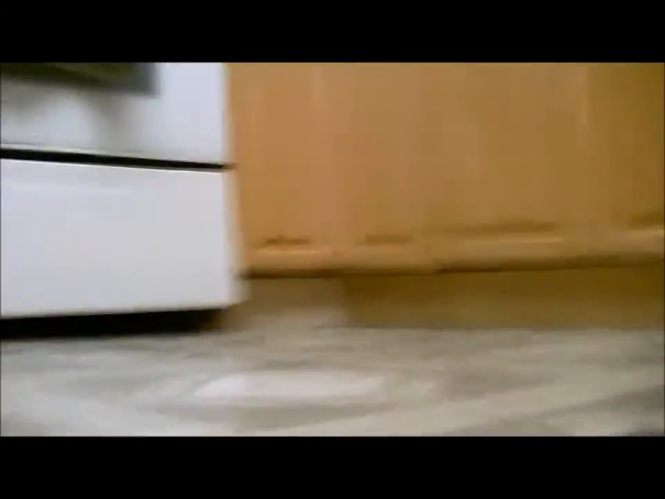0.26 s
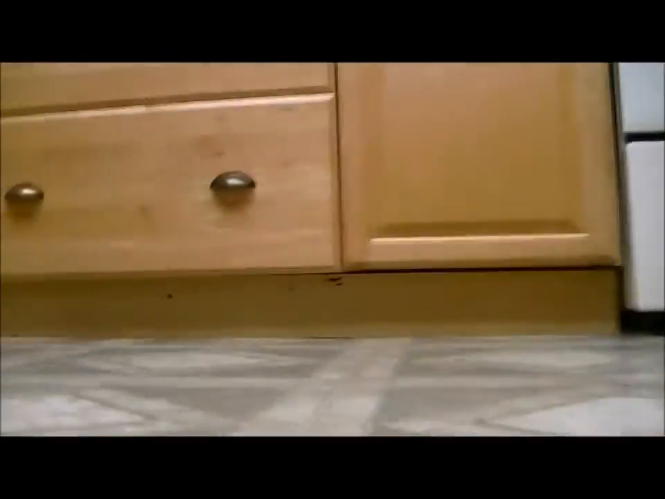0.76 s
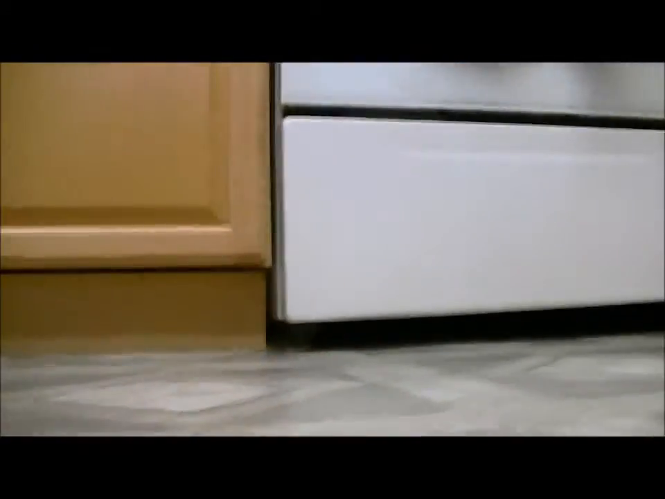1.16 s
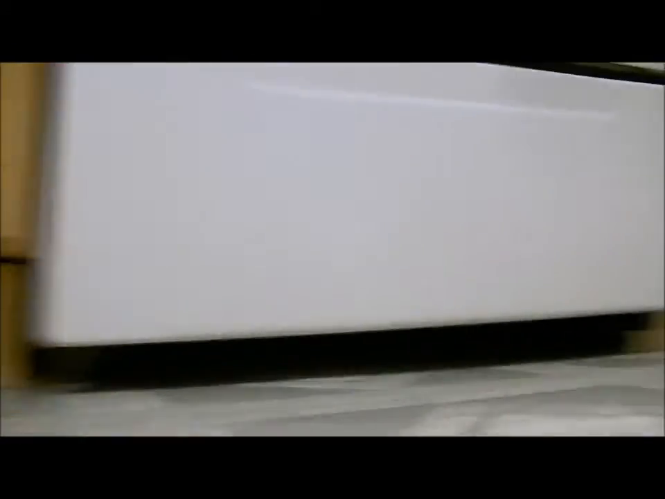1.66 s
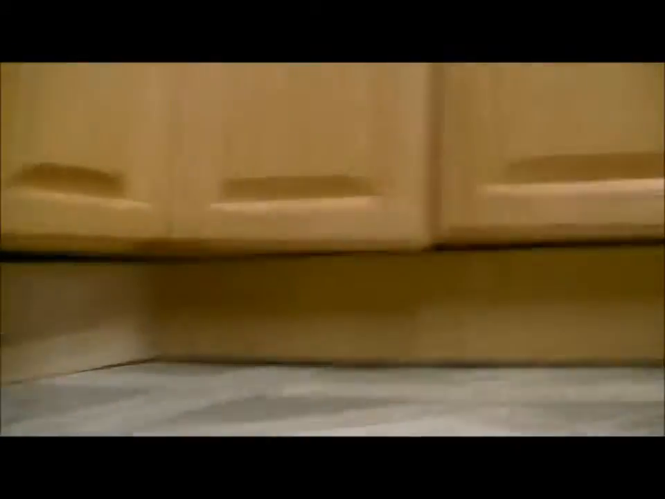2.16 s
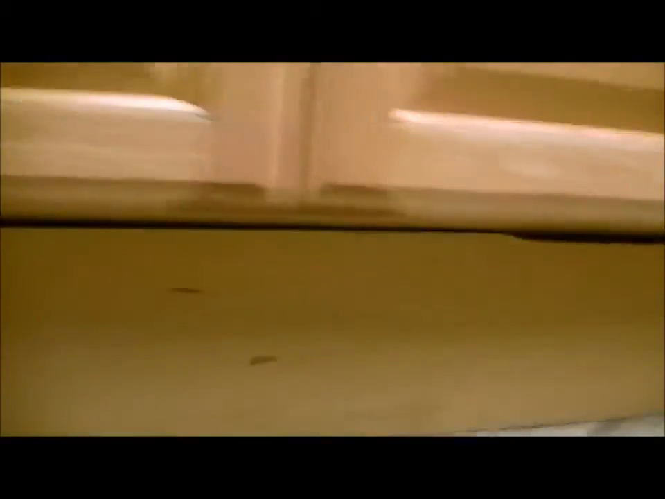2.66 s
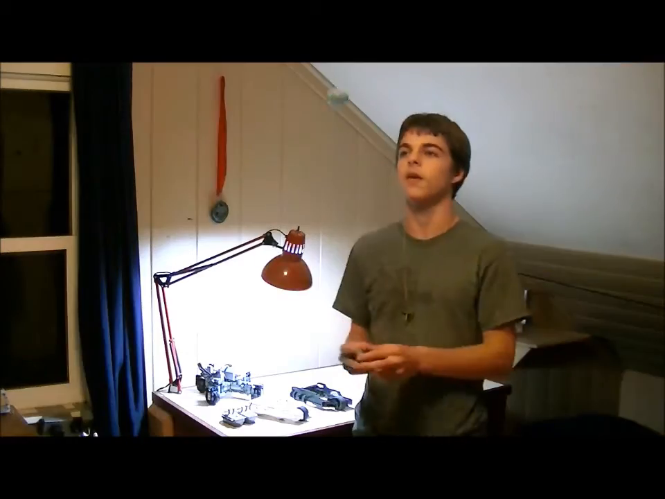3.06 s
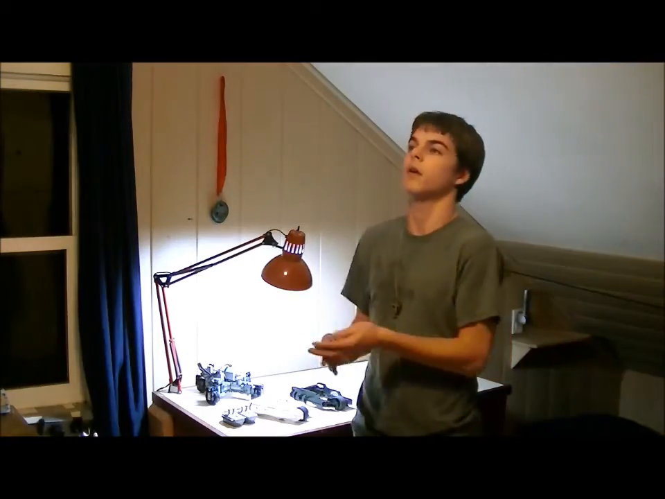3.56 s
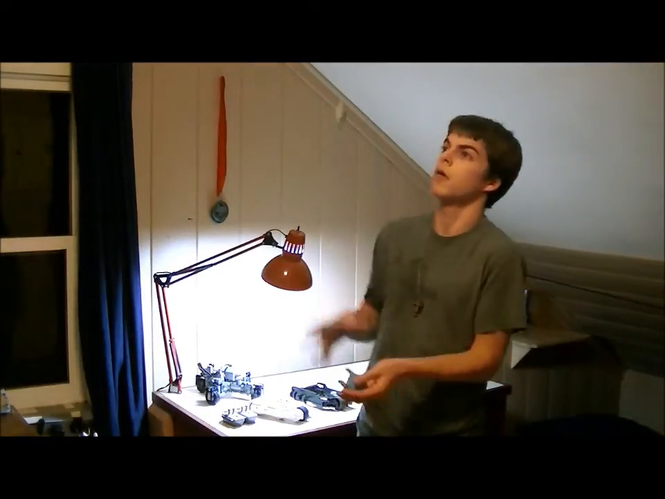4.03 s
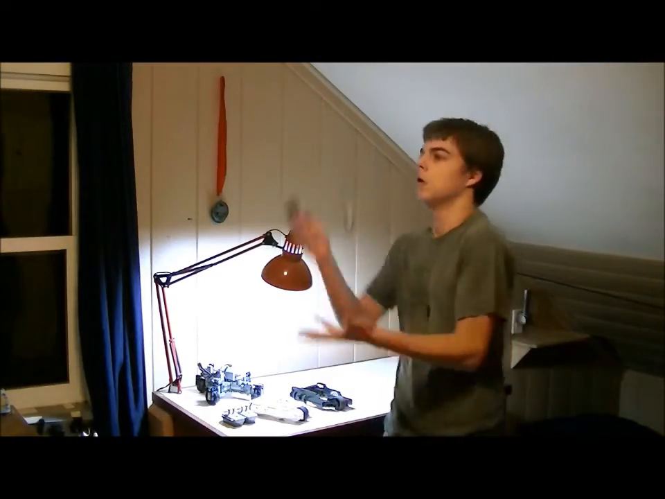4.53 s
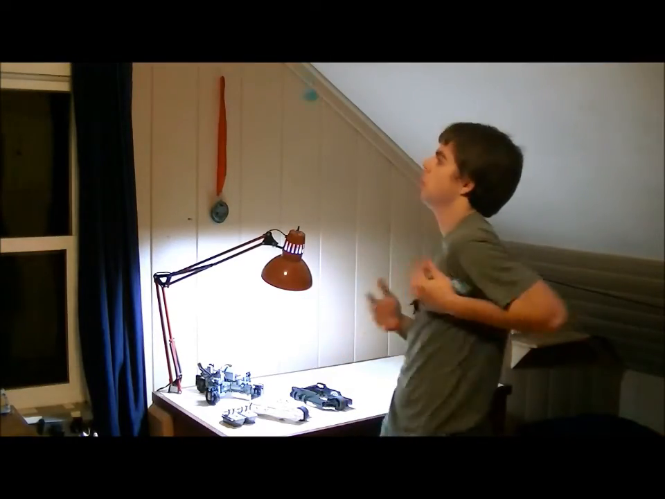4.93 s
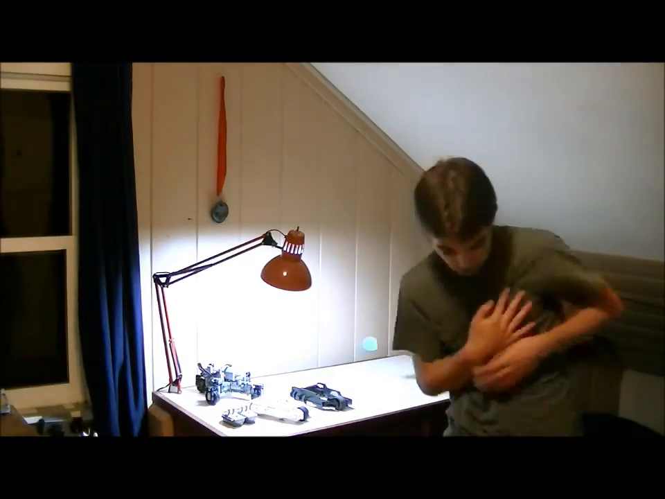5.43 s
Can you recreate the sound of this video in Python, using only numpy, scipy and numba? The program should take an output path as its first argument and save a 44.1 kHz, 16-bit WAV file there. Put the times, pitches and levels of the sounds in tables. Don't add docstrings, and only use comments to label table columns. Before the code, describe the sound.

A small plastic toy car rattles loudly over kitchen tiles, then abruptly a quiet attic room with clicks, slaps and thuds of juggled objects.

```python
import sys
import numpy as np
from scipy import signal
from scipy.fft import rfft, irfft
from scipy.io import wavfile
from scipy.ndimage import uniform_filter1d
from numba import njit

SR = 44100
rng = np.random.default_rng(int(sys.argv[2]) if len(sys.argv) > 2 else 0)


def volts_from_db(level):
    exponent = np.asarray(level, float) / 20
    return 10 ** exponent


def wav_out(sig):
    wavfile.write(sys.argv[1], SR, np.round(np.clip(np.atleast_2d(sig).T, -1, 1) * 32767).astype(np.int16))


N = 250929
TIME_S = np.arange(N) / SR
CUT_S = 2.91


def noise():
    return rng.standard_normal(N)


def level(x, db):
    return x * volts_from_db(db) / np.sqrt(np.mean(x ** 2))


@njit
def svf(x, hz, width_hz):
    y, b, l = np.empty(len(x)), 0., 0.
    for i in range(len(x)):
        g, k = np.tan(np.pi * hz[i] / SR), width_hz / hz[i]
        v = (b + g * (x[i] - l)) / (1 + g * (g + k))
        b, l, y[i] = 2 * v - b, l + 2 * g * v, k * v
    return y


def resonance(x, hz, width_hz):
    return svf(x, np.full(N, float(hz)), width_hz)


def band(x, lo_hz, hi_hz):
    edges_hz = [lo_hz, min(hi_hz, .45 * SR)]
    return signal.sosfilt(signal.butter(2, edges_hz, "bandpass", fs=SR, output="sos"), x)


def steep(x, lo_hz, hi_hz):
    return band(band(x, lo_hz, hi_hz), lo_hz, hi_hz)


def colour(x, spectrum):
    hz, db = np.transpose(spectrum)
    bins_hz = np.fft.rfftfreq(len(x), 1 / SR)
    gain = volts_from_db(np.interp(np.log(bins_hz + 1), np.log(hz), db))
    return irfft(rfft(x) * gain, len(x))


def walk(rate_hz):
    k = int(SR / rate_hz)
    return uniform_filter1d(np.repeat(rng.standard_normal(N // k + 1), k), k)[:N]


def bursts(start_s, db, decay_ms, rise_ms):
    out, t_ms = np.zeros(N + 2048), np.arange(2048) / SR * 1000
    shape = (1 - np.exp(-t_ms / max(rise_ms, .02))) * np.exp(-t_ms / max(decay_ms, .05))
    for at_s, size in zip(start_s, volts_from_db(db)):
        first = int(at_s * SR)
        out[first:first + 2048] += size * shape
    return out[:N]


def held(start_s, value):
    return value[np.clip(np.searchsorted(start_s, TIME_S, side="right") - 1, 0, None)]


# start_s, shaking_db, rattle_ring_hz, rolling_load_db
RIDE_CURVES = [(0.0, -21.5, 5640, -38.5), (0.16, -36, 6480, -43.5), (0.22, -28, 6490, -36),
               (0.23, -14, 6500, -47), (0.29, -31.5, 6160, -39.5), (0.6, -24.5, 6180, -37.5),
               (0.76, -32.5, 6660, -44), (0.8, -16, 6220, -38), (1.11, -25, 6040, -36.5),
               (1.43, -58, 5880, -30), (1.56, -15, 5980, -28.5), (1.68, -21, 6620, -33),
               (1.71, -11.5, 6640, -37), (2.0, -22, 5750, -36), (2.2, -11.5, 6700, -36),
               (2.56, -27.5, 5680, -35.5), (2.75, -18.5, 6580, -36.5), (2.88, -15, 6130, -35)]


def ride(at_s):
    start_s, *columns = np.transpose(RIDE_CURVES)
    return [np.interp(at_s, start_s, column) for column in columns]


# start_s, peak_db, ring_hz
PART_KNOCKS = [(0.0164, -23, 5400), (0.0337, -8, 5260), (0.0814, -15, 5420), (0.1206, -11, 5700),
               (0.1378, -5, 6420), (0.29, -12, 7710), (0.5318, -7, 7500), (0.6489, -19, 6120),
               (0.6644, -22, 6700), (0.8016, -8, 6450), (0.835, -18, 6390), (0.896, -8.5, 5800),
               (1.0407, -8, 5500), (1.3857, -16, 4930), (1.4651, -8, 6510), (1.8046, -2.5, 6080),
               (1.863, -7.5, 6700), (1.8866, -5.5, 5700), (1.916, -33, 5640), (1.958, -8, 7400),
               (2.2059, -1, 7140), (2.222, -12, 6350), (2.2732, -25, 7000), (2.3005, -3, 6550),
               (2.3969, -3, 6600), (2.43, -8, 7460), (2.6015, -3.5, 6340), (2.7347, -1.5, 7100),
               (2.762, -7.5, 6740), (2.837, -4, 6400)]
# start_s, knock_peak_db, clunk_db, sparkle_db
TILE_JOLTS = [(0.0498, -12, -36, -19.5), (0.0726, 3.5, -30.5, -21), (0.1639, -1, -31, -32),
              (0.2296, -1, -27, -32), (0.347, -5, -27.5, -22), (0.417, -7.5, -19.5, -22),
              (0.4796, -4.5, -28.5, -28), (0.5403, -2.5, -30, -30.5), (0.6086, 2, -33.5, -25),
              (0.8694, -2, -31, -27), (0.978, 1, -27, -21.5), (1.0912, -7.5, -24.5, -25),
              (1.1508, -22, -24, -29), (1.2065, -5.5, -21.5, -24.5), (1.241, -9, -25.5, -26),
              (1.2537, -14, -18.5, -25), (1.3069, -7, -22.5, -21), (1.5035, -16, -14.5, -43),
              (1.5338, -2.5, -17.5, -20), (1.59, -3, -30, -21), (1.6292, -5, -48, -22),
              (1.6965, -2, -28, -26.5), (1.8314, -1.5, -33, -22), (2.0376, -5.5, -21, -20.5),
              (2.0877, -10, -22, -22.5), (2.149, -7.5, -21.5, -19.5), (2.1862, -13, -21.5, -20.5),
              (2.344, -2.5, -27, -25.5), (2.4582, -5, -30, -23), (2.6259, -0.5, -23.5, -19.5)]


def blows():
    rows = [(s, db, ride(s)[1], clunk_db, sparkle_db) for s, db, clunk_db, sparkle_db in TILE_JOLTS]
    rows += [(s, db, hz, db - 34, db - 26.5) for s, db, hz in PART_KNOCKS]
    return np.transpose(sorted(rows))


def scraping():
    chance = rng.random((N, 2))
    size_db = np.minimum(-4.0 * np.log(chance[:, 1] + 1e-9), 9.0)
    ticks = (chance[:, 0] < 350 / SR) * volts_from_db(size_db)
    scrape = signal.lfilter([1], [1, -np.exp(-1000 / (SR * 1.3))], ticks)
    scrape = scrape / np.mean(scrape)
    return scrape, (scrape + 0.69) * noise()


def rattle(grit, ring_hz):
    axle_db = np.minimum((5700 - ring_hz) / 70, 0)
    shell_hz = np.maximum(ring_hz, 6100) * (1 + 0.084 * walk(25.14))
    shell = level(steep(svf(grit, shell_hz, 940.0), 5030, 9800), -7.0)
    axle_hz = 5400 * (1 + 0.031 * walk(39))
    axle = level(svf(grit, axle_hz, 350.0) * volts_from_db(0.48 * walk(24.75)), -2.76) * volts_from_db(axle_db)
    return shell + axle + level(band(grit, 9500, 13000), -25.0)


# freq_hz, level_db_per_hz
WHEEL_SPECTRUM = [(150, -62), (250, -5.5), (452, -5.5), (566, -8.5), (1080, -8), (1700, -6.5), (3170, -9),
                  (6470, -5.5), (7980, -12), (10000, -14.5), (12100, -17), (14900, -24), (16000, -40)]


def wheels(scrape, roll_db, heave):
    hiss = colour((scrape + 2.4) * noise(), WHEEL_SPECTRUM)
    hiss = hiss + volts_from_db(-8.0) * resonance(hiss, 1800, 370.0)
    hiss = hiss / np.std(band(hiss, 400, 3900))
    drum = level(band(band(noise(), 106.6, 232), 64, 220) * volts_from_db(2.14 * walk(30.43)), -1.0)
    heave = volts_from_db(-1.5) * heave
    return (volts_from_db(roll_db + 1.5) + heave) * hiss + (volts_from_db(roll_db - 5.5) + heave) * drum


def knocks(grit, start_s, peak_db, ring_hz):
    hit = bursts(start_s, peak_db + 7, 1.22, 0.25) * noise()
    chatter = bursts(start_s, peak_db - 11.5, 7.7, 0.95) * grit
    part_hz = held(start_s, ring_hz)
    return svf(svf(hit + chatter, part_hz, 1970.0), part_hz, 4100.0)


def clunks(start_s, clunk_db, sparkle_db):
    jolt = bursts(start_s, clunk_db + 11.5, 3.76, 0.516) * noise()
    clunk = volts_from_db(-2.0) * band(jolt, 150, 1600) + resonance(jolt, 1270, 250.0)
    flex = steep(bursts(start_s, clunk_db + 2.5, 1.6, 0.58), 115.6, 240)
    sparkle = band(bursts(start_s, sparkle_db + 5.5, 5.0, 0.17) * noise(), 9500, 17000)
    return clunk + flex + sparkle


def toy_car():
    shake_db, ring_hz, roll_db = ride(TIME_S)
    start_s, peak_db, knock_hz, clunk_db, sparkle_db = blows()
    scrape, grit = scraping()
    shake = volts_from_db(shake_db + 0.7) + bursts(start_s, peak_db - 13, 10, 3.3)
    heave = bursts(start_s - .008, clunk_db, 12.9, 5.9)
    car = shake * rattle(grit, ring_hz) + wheels(scrape, roll_db, heave)
    return car + knocks(grit, start_s, peak_db, knock_hz) + clunks(start_s, clunk_db, sparkle_db)


# start_s, click_peak_db, slap_db, slap_hz, thud_db
CATCH_EVENTS = [(3.5634, -24, -41, 2160, -82), (3.7423, -12.5, -27.5, 583, -13),
                (3.8322, -32.5, -53, 622, -53.5), (3.9132, -32, -56, 2070, -52.5),
                (4.154, 1, 6.5, 1540, -10), (4.4415, -1, -0.5, 736, -25.5), (4.6103, -5, -22, 1730, -26),
                (4.7614, -7.5, -15, 750, -26.5), (4.781, -7, -15.5, 681, -53), (4.933, -30, -36, 729, -41),
                (5.1589, -12, -17, 1600, -54.5), (5.1756, -8, -21.5, 680, -41),
                (5.2906, -5, 1.5, 1204, -12), (5.5036, -20, -43.5, 593, -28), (5.6157, -4.5, -2, 1280, -19),
                (5.6638, -18.5, -40, 904, -27), (5.238, -26, -29.5, 1500, -52)]
# start_s, click_peak_db, click_hz
FINGER_TOUCHES = [(2.9969, -23, 5730), (3.4727, -18, 9000), (3.4793, -23.5, 7000), (3.5583, -13, 8250),
                  (4.017, -39, 5570), (4.1023, -40, 5040), (4.2724, -25, 6900), (4.387, -46, 6170),
                  (4.6026, -12.5, 6370), (4.6985, -24, 8450), (4.7362, -27.5, 7900), (5.411, -32.5, 9600),
                  (5.479, -55, 6600)]
# start_s, slap_db
SHIRT_FUMBLE = [
    (4.9912, -38),
    (5.0021, -25),
    (5.0261, -18),
    (5.0474, -25.5),
    (5.0967, -24.5),
    (5.1163, -29),
]


def contacts():
    rows = [(s, click_db, 4990 - 33.5 * slap_db, slap_db, slap_hz, thud_db)
            for s, click_db, slap_db, slap_hz, thud_db in CATCH_EVENTS]
    rows += [(s, db, hz, db - 41.5, 2400, -90) for s, db, hz in FINGER_TOUCHES]
    rows += [(s, db + 1.5, 6900, db, 940, db - 19) for s, db in SHIRT_FUMBLE]
    return np.transpose(sorted(rows))


def juggling():
    start_s, click_db, click_hz, slap_db, slap_hz, thud_db = contacts()
    snap = bursts(start_s, click_db, 0.7, 0.033) * noise()
    click = volts_from_db(8.0) * svf(snap, held(start_s, click_hz), 1100.0) + volts_from_db(2.0) * band(snap, 2800, 13000)
    skin = bursts(start_s, slap_db + 8.0, 2.0, 1.0) * noise()
    palm = bursts(start_s, slap_db + 26, 0.064, 0.059) + skin
    slap = steep(svf(palm, held(start_s, slap_hz), 720.0) + volts_from_db(3.0) * palm, 490, 2096)
    push = bursts(start_s, thud_db + 16.5, 1.0, .1) + bursts(start_s, thud_db + 26.5, 5.1, 1.6) * noise()
    thud = steep(push, 237, 600) + volts_from_db(-4.5) * resonance(push, 280, 30.0)
    joists = band(bursts(start_s, 0.85 * thud_db + 7.5, 0.49, 0.43), 94, 230)
    return click + slap + thud + joists


# start_s, peak_db, ring_hz, length_ms
TOSS_SWISHES = [
    (2.967, -27, 6370, 4.8),
    (2.9834, -28, 6590, 2.8),
    (2.997, -8, 6600, 3.7),
    (3.0194, -28, 6300, 4.2),
    (3.0455, -20, 6540, 8),
    (3.0644, -29, 6460, 5.1),
    (3.125, -29.5, 6340, 3.8),
    (3.1697, -29, 5900, 3.3),
    (3.24, -36.5, 6700, 6.7),
]


def toss():
    envelope = sum(bursts([s], [db], length_ms, 0.98) for s, db, _, length_ms in TOSS_SWISHES)
    start_s, _, ring_hz, _ = np.transpose(TOSS_SWISHES)
    return volts_from_db(2.5) * steep(svf(envelope * noise(), held(start_s, ring_hz), 1700.0), 3300, 9400)


# freq_hz, t60_s, tail_over_direct_db
ROOM_TAIL = [(90, 0.19, 4.5), (202, 0.28, 8.5), (440, 0.2, 9.5), (990, 0.19, 4.5), (2240, 0.18, 9),
             (5000, 0.16, 5), (11000, 0.16, 3)]
# freq_hz, level_db, t60_s
BOARD_MODES = [(275, -12, 0.36), (337, 4.0, 0.14), (477.3, 3, 0.18), (540, -14.5, 0.33), (702, -2.5, 0.31),
               (1036, 1.5, 0.12), (1332, 4, 0.058), (1750, -1, 0.18), (1710, -11, 0.092)]


def attic(x):
    out, step = x, 2 ** (1 / 6)
    tail_hz, *columns = np.transpose(ROOM_TAIL)
    for hz in 70 * step ** np.arange(0, 47, 2):
        t60_s, wet_db = (np.interp(np.log(hz), np.log(tail_hz), c) for c in columns)
        keep = volts_from_db(-120 / SR / t60_s)
        energy = signal.lfilter([1 - keep], [1, -keep], 0.94 * steep(x, hz / step, hz * step) ** 2)
        diffuse = level(band(noise(), hz / step, hz * step), 0)
        out = out + volts_from_db(wet_db) * np.sqrt(energy) * diffuse
    t_s = np.arange(SR // 2) / SR
    boards = sum(volts_from_db(db - 60 * t_s / min(t60_s, .3)) * np.sin(2 * np.pi * hz * t_s)
                 for hz, db, t60_s in BOARD_MODES)
    return out + volts_from_db(-45.5) * signal.fftconvolve(x, boards)[:N]


# freq_hz, level_db
CREAK_PARTIALS = [(382.2, -57.5), (667.5, -43), (1470, -38.5)]


def creak():
    corner_s = np.cumsum([5.175, .012, .11, .25])
    corner_db = -30 + np.array([-20, 0, -4, -30])
    turns_s = np.cumsum(1 + .004 * walk(40)) / SR
    lines = sum(volts_from_db(db + 2.1 * walk(60)) * np.sin(2 * np.pi * hz * turns_s) for hz, db in CREAK_PARTIALS)
    return level(lines, 0) * volts_from_db(np.interp(TIME_S, corner_s, corner_db, left=-120, right=-120))


# start_s, effort_db
ARM_SWING = [
    (2.95, -71),
    (3.09, -54.5),
    (3.25, -68),
    (3.6, -64),
    (3.82, -50.5),
    (4.3, -61.5),
    (4.64, -58),
    (4.82, -40.5),
    (5.69, -52.5),
]


def rustle():
    cloth = level(band(noise(), 2200, 6800) * volts_from_db(3.5 * walk(70)), 0)
    return volts_from_db(np.interp(TIME_S, *np.transpose(ARM_SWING))) * cloth


# start_s, load_db
FLOOR_WEIGHT = [
    (2.91, -64),
    (4.11, -67.5),
    (4.26, -41.5),
    (4.5, -45),
    (4.64, -32.5),
    (4.82, -36.5),
    (5.15, -32.5),
    (5.36, -33.5),
    (5.6, -45),
]


def groan():
    floor = level(band(band(noise(), 300, 430), 330, 530) * volts_from_db(5.8 * walk(20)), 0)
    return volts_from_db(np.interp(TIME_S, *np.transpose(FLOOR_WEIGHT))) * floor


# freq_hz, level_db_per_hz
HUSH_SPECTRUM = [(35, -26), (60, -4.5), (182, -6), (209, -9), (246, -7.5), (418, -16.5), (458, -12.5),
                 (938, -16.5), (1150, -17), (2530, -18.5), (2980, -17), (3270, -19.5), (9450, -25.5),
                 (15000, -30)]


def hush():
    return level(colour(noise(), HUSH_SPECTRUM + [(19000, -63.0)]), -52.5)


def scene():
    upstairs = attic(juggling() + toss()) + creak() + rustle() + groan() + hush()
    return np.where(np.arange(N) < CUT_S * SR, toy_car(), upstairs)[None]


@njit
def gain_control(x, top, attack, release):
    y, e = np.empty(len(x)), 0.
    for i in range(len(x)):
        y[i] = x[i] * top / max(e, top)
        e += (abs(x[i]) - e) * (attack if abs(x[i]) > e else release)
    return y


def band_limit(x):
    return signal.sosfilt(signal.butter(12, 16800, fs=SR, output="sos"), x)


def record(dry):
    cut = int(CUT_S * SR)
    dry = signal.sosfilt(signal.butter(2, 50, "highpass", fs=SR, output="sos"), dry)
    attack_s, release_s = .0097, .35
    ducked = gain_control(dry[0, cut:], 0.15, 1 / (attack_s * SR), 1 / (release_s * SR))
    mix = np.clip(np.concatenate([dry[0, :cut], ducked])[None], -.83, .83)
    mix = signal.sosfilt(signal.ellip(8, .3, 50, 15900, fs=SR, output="sos"), mix)
    return band_limit(mix)


dry = scene()
out = record(dry)
wav_out(out)
```